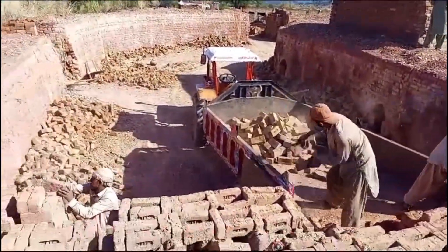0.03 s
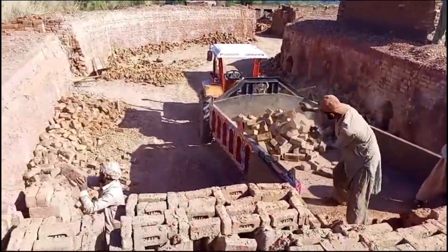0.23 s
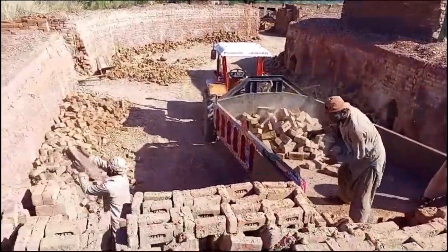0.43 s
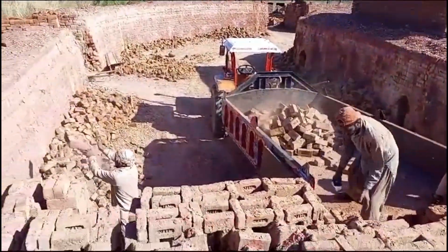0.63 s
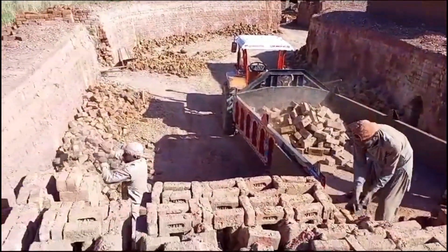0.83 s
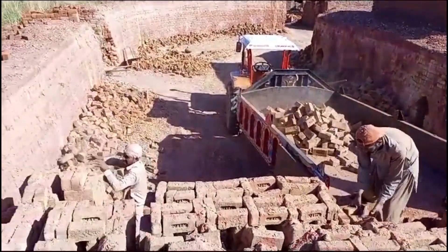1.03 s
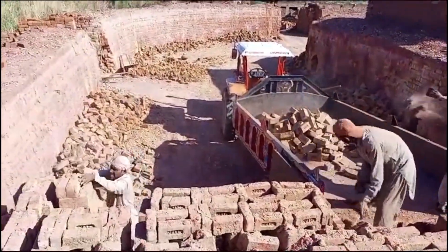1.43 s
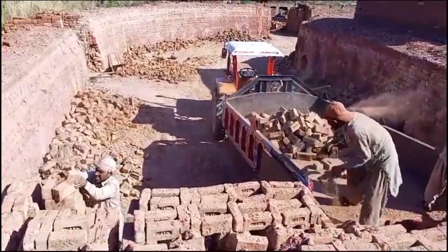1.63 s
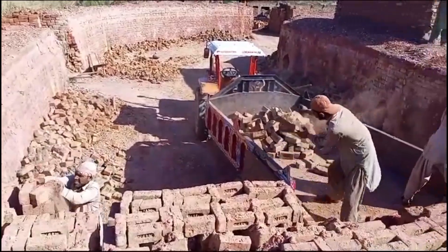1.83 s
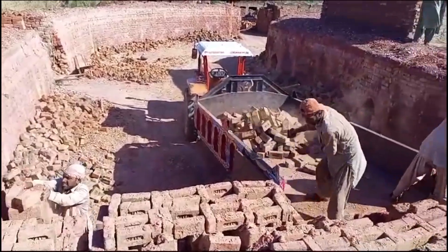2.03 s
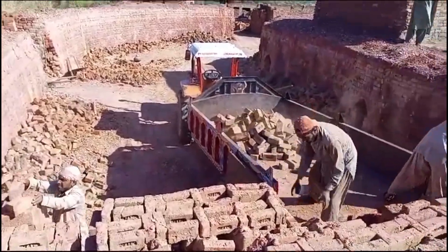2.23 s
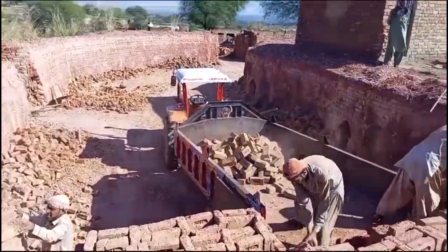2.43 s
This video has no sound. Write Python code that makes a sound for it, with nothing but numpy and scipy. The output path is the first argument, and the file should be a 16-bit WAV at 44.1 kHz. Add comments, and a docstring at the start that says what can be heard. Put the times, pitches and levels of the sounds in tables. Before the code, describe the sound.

Bricks tossed onto a heap in a steel trailer knock and clack in irregular bursts.

```python
"""Bricks tossed into a steel trailer

Bricks land on a heap in a trailer that stands in an open kiln pit. Each landing is a crunch of tiny
contacts: the load thuds, bricks knock and clack, grit spits, and a free brick rings in its normal modes.
The steel booms under the heap, chips scrape, crumbs trickle, and the pit walls return a dull tail.
Behind it all lie quiet open air and one faint squeal."""
import sys
import numpy as np
from scipy import signal
from scipy.fft import rfft, irfft
from scipy.io import wavfile
from scipy.ndimage import uniform_filter1d

SR = 44100
rng = np.random.default_rng(int(sys.argv[2]) if len(sys.argv) > 2 else 0)


def transcribe(u):
    """Save the signal u as a 16-bit wav file named by the first command-line argument.

    u: samples, shape (n,) or (channels, n), limited to [-1, 1]; the rate is SR.
    q: integer samples, one column per channel.
    """
    v = np.clip(np.atleast_2d(u).T, -1, 1)
    q = np.round(v * 32767).astype(np.int16)
    wavfile.write(sys.argv[1], SR, q)


N = 114660

# landings, bounces and topples (time [s], thud [dB], knock [dB], clack [dB], grit [dB], base decay [s])
IMPACTS = [ (0.002, -32.5, -39, -43, -57, 0.021), (0.015, -36, -43.5, -57, -66, 0.13),
           (0.197, -31, -38, -46, -63, 0.013), (0.205, -19, -16.5, -29, -36, .008),
           (0.272, -27, -33, -44, -52, 0.022), (0.335, -14, -17, -24.5, -49.5, 0.013),
           (0.351, -19.5, -20, -28, -54, 0.019), (0.397, -27, -29.5, -56, -61, 0.028),
           (0.432, -16.5, -13, -22, -43.5, .021), (0.464, -24, -15.5, -25, -49.5, 0.024),
           (0.501, -22, -21.5, -38, -71, 0.014), (0.642, -29, -25, -32, -35.5, .024),
           (0.682, -24, -24, -35, -44, 0.024), (0.717, -25, -25, -35.5, -41, 0.022),
           (0.794, -35, -33, -46, -51, 0.035), (0.877, -31.5, -27, -36.5, -50, .05),
           (0.960, -29, -22, -32, -34, 0.0062), (0.976, -37, -20.5, -29, -37, 0.0092),
           (1.015, -33, -25.5, -33.5, -57, 0.05), (1.052, -23.5, -25, -33.5, -37.5, 0.021),
           (1.081, -33, -17, -28, -37.5, 0.022), (1.104, -35, -20.5, -30, -43, 0.023),
           (1.139, -34.5, -22, -27, -36.5, 0.02), (1.205, -30, -29, -40, -71, 0.033),
           (1.796, -21.5, -17, -27, -31, 0.016), (1.814, -25, -22, -28, -38, .01),
           (1.851, -26, -20, -27.5, -33, 0.009), (1.857, -20, -18, -36, -52, 0.01),
           (1.874, -21.5, -18.5, -31, -55, 0.013), (1.904, -19, -19.5, -34, -48, .009),
           (1.996, -41, -47, -57, -68, 0.018), (2.171, -30, -38, -53, -57, 0.022),
           (2.240, -25.5, -20.5, -31, -37.5, .017), (2.274, -32.5, -20, -32, -38, .01),
           (2.304, -28, -37, -45, -43, 0.017), (2.321, -29, -31, -44, -35.5, .011),
           (2.400, -36, -45, -55, -62, 0.06), (2.474, -54, -52, -48.5, -49.5, 0.0067),
           (2.591, -44, -44.5, -50, -66, 0.037)]
# spectra of the four layers of an impact (frequency [Hz], relative level [dB])
THUD_SPECTRUM = [(30, -45.5), (60, -22.5), (100, -6.5), (150, 2.5), (220, 1.5), (320, -2.5), (450, -15.5),
                 (900, -50), (3000, -84.5)]
KNOCK_SPECTRUM = [(100, -31), (280, -10), (430, -8), (550, 1.5), (800, -5.5), (1100, -9), (1500, -25),
                  (3000, -46), (8000, -67)]
CLACK_SPECTRUM = [(400, -23), (1000, -0.5), (1450, 4), (1950, -6), (2500, -11), (3300, -9), (4200, -25),
                  (7000, -54.5), (15000, -65)]
GRIT_SPECTRUM = [(1000, -43), (3300, 6.5), (4500, -3), (5400, 1.5), (6400, 4), (7300, -11.5), (8200, -14),
                 (9500, -6.5), (11500, -28.5), (13800, -25), (15200, -15.5), (16500, -21)]
# their textures (contact spread [-], pit echo [dB], pit t60 [s], decay factor [-], attack [s])
THUD_TEXTURE = (.4, -8, .8, 1.0, .002)
KNOCK_TEXTURE = (.45, -8, .62, 1.05, .002)
CLACK_TEXTURE = (.5, -7, .56, 1.15, .002)
GRIT_TEXTURE = (.98, -16, .45, .8, .0007)
# normal modes of the trailer's bed and sides (frequency [Hz], relative level [dB])
BED_RESONANCES = [(105, -5), (146, -6), (180, -1.5), (296, -3)]
SIDE_RESONANCES = [(480, -1), (554, -4), (674, -1), (791, 0), (844, -1), (1039, 1), (1190, 2)]
# direct strikes on a steel panel (time [s], frequency [Hz], level [dB], t60 [s])
PANEL_STRIKES = [(0.336, 300, -18, .07), (0.338, 209, -17, .34), (0.435, 193, -16.5, .72),
                 (0.462, 375, -18, .08), (0.69, 180, -28, .5), (1.06, 281, -39, 1.7),
                 (1.088, 585, -26.5, .6), (1.103, 786, -24, .24), (1.868, 535, -12, .07),
                 (2.275, 890, -23, .066)]
# bricks that rebound and ring (time [s], fundamental [Hz], gain [dB], t60 of the fundamental [s])
REBOUNDS = [(0.208, 4335, -34, .033), (0.644, 2850, -34, .06), (0.647, 3660, -36, .12),
            (0.683, 2810, -35, .08), (0.961, 3000, -29, .022), (0.974, 2330, -29, .06),
            (1.086, 3090, -33, .15), (1.140, 5400, -30, .035), (1.800, 2130, -31, 0.067),
            (1.818, 2160, -27, .09), (1.830, 1020, -20, .045), (1.837, 1450, -10.5, 0.016),
            (2.243, 2125, -34, .1), (2.276, 2960, -32, .1), (2.305, 2960, -32, .1), (2.323, 3060, -38, .12)]
# normal modes of a brick (ratio to the fundamental [-], level before tilt [dB])
BRICK_PARTIALS = [(1, 1.5), (1.04, -7), (1.33, -12), (2.1, -1), (2.21, -7), (3.3, -12)]
# sliding bricks and chips (time [s], duration [s], level [dB])
SLIDES = [(0.106, 0.083, -51), (1.375, 0.023, -52), (1.445, 0.029, -55), (1.626, .02, -55.5),
          (2.417, 0.23, -59)]
# open air (frequency [Hz], relative spectral density [dB])
AIR_SPECTRUM = [(30, -22), (110, -2), (290, 1), (400, -9), (550, -3), (900, -14), (2300, -24), (3300, -22),
                (6200, -26), (7700, -40), (9500, -36), (11500, -51)]

BEAT_HZ, TWIN_DB = 14.3, -4  # each panel note has a close twin that makes it throb
PANEL_ATTACK_S, BRICK_ATTACK_S, ECHO_BUILD_S = .0061, .0009, .012
RING_BLUR_HZ = 48  # line width of a brick that chatters against its neighbours
BRIGHT_HZ, DULLING_DB = 2870, 40  # heavier bricks and smaller pieces lose their upper modes


def landings():
    """Impact noise: the heap thuds, knocks, clacks and spits grit; the first two drive the trailer."""
    _, thud_db, knock_db, clack_db, grit_db, _ = np.array(IMPACTS).T
    thud, thud_heard = crunch(thud_db, THUD_SPECTRUM, THUD_TEXTURE)
    knock, knock_heard = crunch(knock_db, KNOCK_SPECTRUM, KNOCK_TEXTURE)
    _, clack_heard = crunch(clack_db, CLACK_SPECTRUM, CLACK_TEXTURE)
    _, grit_heard = crunch(grit_db, GRIT_SPECTRUM, GRIT_TEXTURE)
    bed = trailer(thud, BED_RESONANCES, gain_db=-11.5, t60=.45)
    sides = trailer(knock, SIDE_RESONANCES, gain_db=-12.5, t60=.45)
    return thud_heard + knock_heard + clack_heard + grit_heard + bed + sides


def crunch(levels, spectrum, texture, size=12000):
    """Source and filter: decaying bursts of contacts form one layer, returned without and with echo."""
    spread, echo_db, t60, decay_factor, attack = texture
    out, t, body = np.zeros(N), np.arange(size) / SR, colour(spectrum)
    for (start, *_, decay), db in zip(IMPACTS, levels):
        envelope = np.exp(-t / (decay_factor * decay)) * (1 - np.exp(-t / attack))
        burst = unit(through(contacts(size, spread) * envelope, body))
        add(out, start, burst * undb(db) * np.sqrt(decay * SR / 2))  # longer bursts carry more energy
    return out, pit(out, echo_db, t60)


def trailer(drive, modes, gain_db, t60):
    """Forced vibration: steel panels answer the blows at their natural frequencies."""
    t = np.arange(SR) / SR
    panel = sum(undb(db) * np.sin(2 * np.pi * hz * t) for hz, db in modes) * fade(t, t60)
    return level(through(drive, panel), gain_db) * np.std(drive)


def panel_booms():
    """Beating: a directly struck panel sounds two close frequencies that interfere."""
    out, t = np.zeros(N), np.arange(SR) / SR
    for start, hz, db, t60 in PANEL_STRIKES:
        pair = np.sin(2 * np.pi * hz * t) + undb(TWIN_DB) * np.sin(2 * np.pi * (hz + BEAT_HZ) * t)
        add(out, start, undb(db) * pair * fade(t, t60) * (1 - np.exp(-t / PANEL_ATTACK_S)))
    return pit(out, echo_db=-18, t60=.74)


def brick_clinks(size=8000):
    """Free vibration: loose bricks ring in damped modes, the higher ones dying sooner."""
    out, t = np.zeros(N), np.arange(size) / SR
    for start, hz, db, t60 in REBOUNDS:
        tilt = -DULLING_DB * abs(np.log2(hz / BRIGHT_HZ))  # dB per octave
        ring = np.zeros(size)
        for ratio, mode_db in BRICK_PARTIALS:
            gain = undb(mode_db + tilt * np.log2(ratio))
            ring += gain * tone(hz * ratio, RING_BLUR_HZ, size) * fade(t, t60 / np.sqrt(ratio))
        add(out, start, undb(db) * ring * (1 - np.exp(-t / BRICK_ATTACK_S)))
    return pit(out, echo_db=-14, t60=.2)


def brick_tap(start=2.524, peak_db=-31, size=2000):
    """Impulsive excitation: one brief contact of brick on brick gives a broadband tick."""
    out, t = np.zeros(N), np.arange(size) / SR
    body = colour(CLACK_SPECTRUM) + .5 * colour(GRIT_SPECTRUM)
    tap = through(contacts(size, spread=.4) * fade(t, t60=.014), body)
    add(out, start, undb(peak_db) * tap / np.max(np.abs(tap)))
    return out


def scrapes():
    """Sliding friction: bricks and chips rub in a run of contacts that swells and fades."""
    out = np.zeros(N)
    body = colour(GRIT_SPECTRUM) + .87 * colour(CLACK_SPECTRUM)
    for start, duration, db in SLIDES:
        count = int(duration * SR)
        rub = through(contacts(count, spread=.36), body)
        swell = np.sin(np.pi * np.linspace(0, 1, count) ** .57)
        add(out, start, level(rub * swell, db))
    return out


def crumbs(swing_db=4):
    """Granular noise: tiny impacts merge into a trickle whose level wanders."""
    trickle = contacts(N, spread=.9) * undb(swing_db * wander(rate_hz=14))
    return level(through(trickle, colour(GRIT_SPECTRUM)), db=-69)


def pit(x, echo_db, t60):
    """Reverberation: scattering from the pit walls adds a decaying tail to the direct sound."""
    t = np.arange(SR) / SR
    tail = rng.standard_normal(SR) * fade(t, t60) * (1 - np.exp(-t / ECHO_BUILD_S))
    return x + undb(echo_db) * through(x, unit(tail))


def outdoors(squeal_start=1.33, squeal_duration=.36):
    """Ambient noise: quiet broadband air and one faint narrowband squeal."""
    out = level(through(rng.standard_normal(N), colour(AIR_SPECTRUM)), db=-55)
    count = int(squeal_duration * SR)
    squeal = tone(hz=1815, blur_hz=45, count=count) * np.sin(np.linspace(0, np.pi, count))
    add(out, squeal_start, level(squeal, db=-68))
    return out


def contacts(count, spread):
    """Random excitation: dense tiny impacts with a log-normal spread of strength."""
    return rng.standard_normal(count) * np.exp(spread * rng.standard_normal(count))


def tone(hz, blur_hz, count):
    """Phase diffusion: a random walk in phase widens the spectral line of a sine."""
    stray = np.cumsum(rng.standard_normal(count)) * np.sqrt(2 * np.pi * abs(blur_hz) / SR)
    return np.sin(2 * np.pi * hz * np.arange(count) / SR + uniform_filter1d(stray, size=200))


def wander(rate_hz):
    """Slow modulation: interpolated random values with a spread near 1."""
    knots = rng.standard_normal(N)
    return np.interp(np.arange(N) * rate_hz / SR, np.arange(N), knots)


def colour(spectrum, size=2048):
    """Minimum-phase impulse response with the given spectral shape."""
    hz, db = np.array(spectrum).T
    bins_hz = np.maximum(np.arange(size // 2 + 1) * SR / size, 1)
    magnitude = undb(np.interp(np.log(bins_hz), np.log(hz), db))
    cepstrum = irfft(np.log(magnitude))
    cepstrum[1:size // 2] *= 2  # folding makes the response causal
    cepstrum[size // 2 + 1:] = 0
    return unit(irfft(np.exp(rfft(cepstrum))))


def through(x, response):
    """Convolution with an impulse response."""
    return signal.fftconvolve(x, response)[:len(x)]


def fade(t, t60):
    """Exponential damping of 60 dB in t60."""
    return np.exp(-np.log(1000) * t / t60)


def undb(db):
    """Amplitude ratio from decibels."""
    return 10 ** (np.asarray(db) / 20)


def unit(x):
    """Normalisation to unit energy."""
    return x / np.sqrt(np.sum(x ** 2) + 1e-18)


def level(x, db):
    """Normalisation to an rms level."""
    return unit(x) * np.sqrt(len(x)) * undb(db)


def add(out, start, x):
    """Superposition of x at a start time in seconds."""
    i = max(int(start * SR), 0)
    out[i:i + len(x)] += x[:max(N - i, 0)]


def scene():
    """Superposition: all sources sum at one listening point."""
    bricks = landings() + panel_booms() + brick_clinks()
    debris = pit(brick_tap() + scrapes(), echo_db=-8, t60=.34) + crumbs()
    return (bricks + debris + outdoors())[None]


def record(dry):
    """Band limiting: a steep low-pass filter removes the highest treble."""
    cutoff_hz = 15900
    return signal.sosfilt(signal.ellip(8, .2, 70, cutoff_hz, fs=SR, output="sos"), dry)


dry = scene()
out = record(dry)
transcribe(out)
```